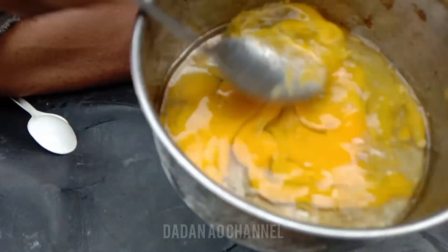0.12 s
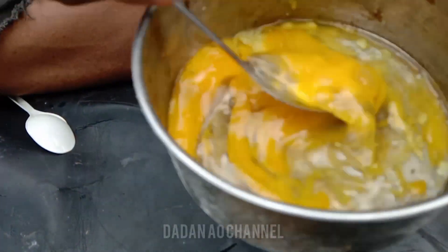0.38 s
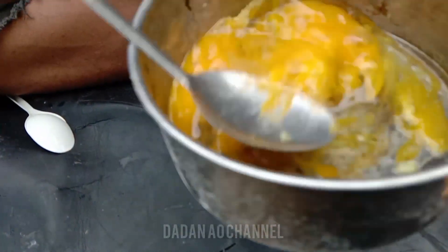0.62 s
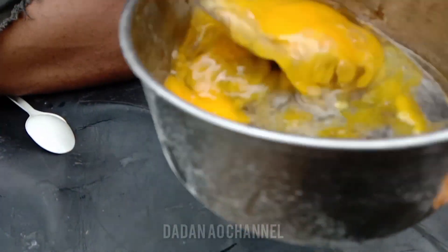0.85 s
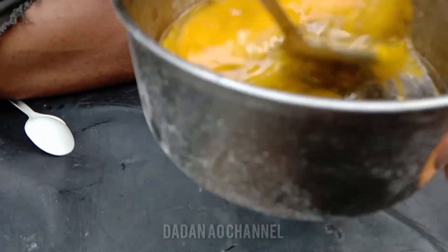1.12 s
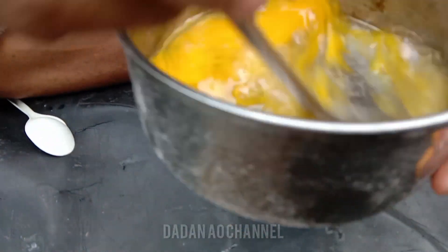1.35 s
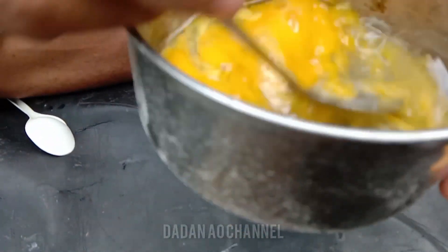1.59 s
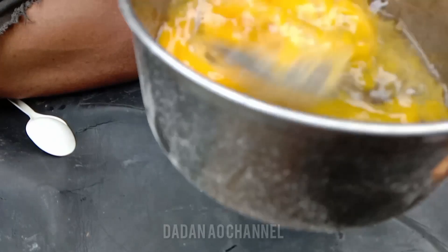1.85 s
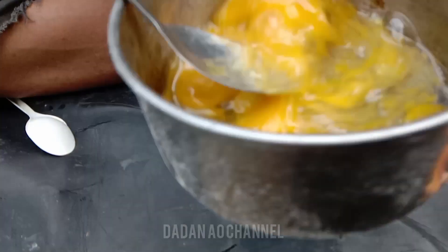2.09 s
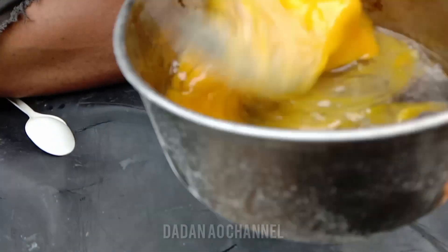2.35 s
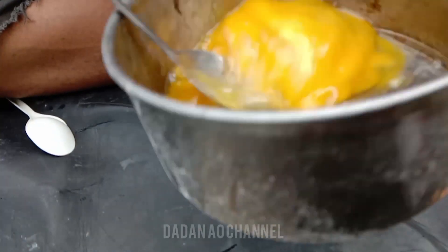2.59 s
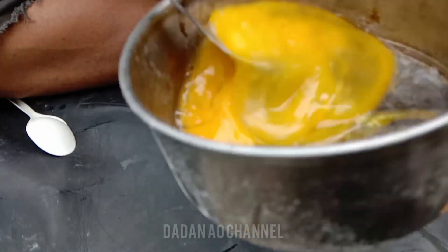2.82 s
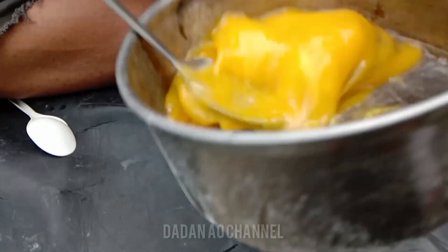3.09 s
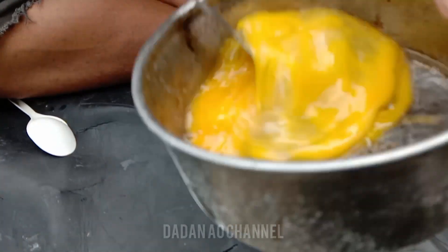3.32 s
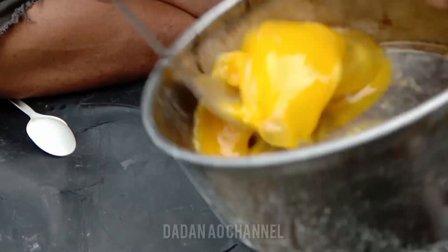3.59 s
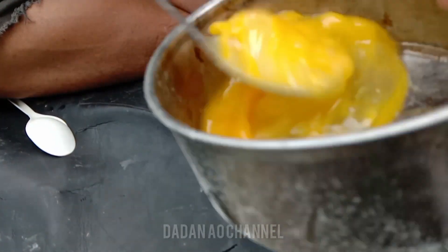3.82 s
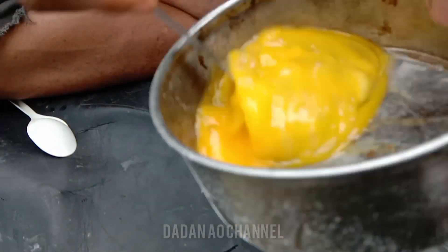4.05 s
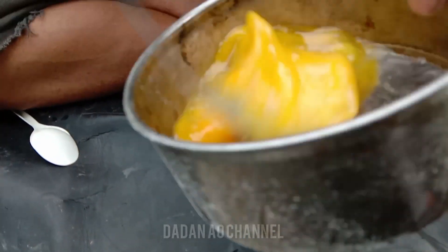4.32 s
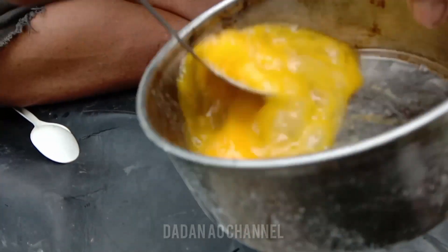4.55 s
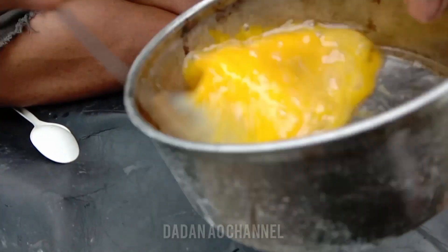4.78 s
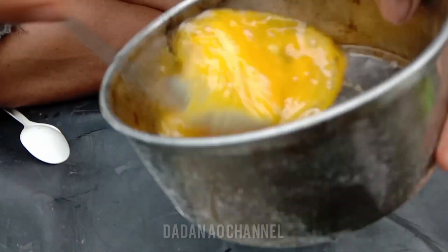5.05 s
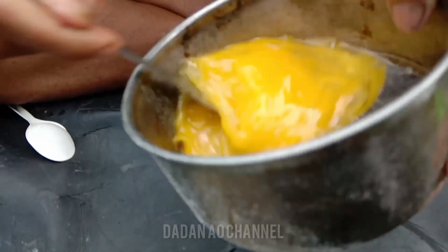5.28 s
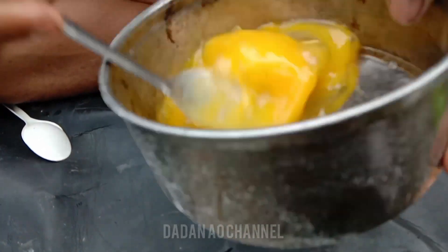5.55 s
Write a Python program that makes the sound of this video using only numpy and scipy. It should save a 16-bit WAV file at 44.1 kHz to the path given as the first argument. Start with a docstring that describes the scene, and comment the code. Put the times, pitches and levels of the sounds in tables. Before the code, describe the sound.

Close, quick metallic knocks and gritty scrapes of a spoon whisking wet eggs in a metal bowl, settling into a brisk regular beat.

```python
"""Knocks, scrapes and wet slaps: a steel spoon beats raw eggs in a thin steel bowl, close to a phone; insects
shrill outside. First loose scraping swirls, then six strokes a second. Knocks ring damped modes of bowl and
spoon, drags are noise and random slips played into those modes, egg slaps are gliding tones, floor and foot
give low thuds, insects and air are filtered noise."""
import sys
import numpy as np
from scipy import signal
from scipy.fft import rfft, irfft, next_fast_len
from scipy.io import wavfile
from scipy.ndimage import uniform_filter1d, map_coordinates

SR = 44100
rng = np.random.default_rng(int(sys.argv[2]) if len(sys.argv) > 2 else 0)


def to_wav(s):
    """Save 16-bit WAV."""
    ch = np.atleast_2d(s).T  # columns
    pcm = np.round(np.clip(ch, -1, 1) * 32767)  # PCM
    wavfile.write(sys.argv[1], SR, pcm.astype(np.int16))


def convert_level_to_amplitude(level_db):
    """Map a level in decibels to its linear amplitude factor."""
    exponent = np.asarray(level_db, float) / 20
    return 10 ** exponent


N = 249687

# spoon meets bowl: (time [s], relative bowl level [dB], pitch the blow favours [Hz],
# relative spoon level [dB], ring length [share 0-1])
KNOCKS = [(0.025, -40, 1210, -33.5, 0.7), (0.086, -34, 1860, -25, 0.9), (0.123, -42, 1244, -19.5, 0.9),
          (0.137, -20.5, 794, -20.5, 0.9), (0.17, -27, 1940, -27, 0.8), (0.192, -30, 1930, -20, 0.9),
          (0.238, -19, 1820, -19.5, 1), (0.287, -25.5, 832, -24, 0.8), (0.311, -21, 1940, -30, 0.6),
          (0.323, -14.5, 830, -22, 0.6), (0.406, -27.5, 1170, -15, 0.7), (0.421, -12.5, 793, -26.5, 0.7),
          (0.508, -29.5, 1610, -23.5, 0.7), (0.566, -7.5, 1110, -18, 0.7), (0.632, -23.5, 1170, -17.5, 0.7),
          (0.694, -7.5, 1152, -23.5, 0.6), (0.706, -15, 950, -22.5, 0.9), (0.785, -28.5, 1440, -19, 1),
          (0.846, -17.5, 1120, -27.5, 1), (0.854, -21, 1150, -18.5, 0.9), (0.895, -17.5, 1090, -18, 0.8),
          (0.911, -15, 1227, -35, 0.5), (0.957, -24.5, 1210, -17, 0.7), (1.021, -2, 895, -25, 0.73),
          (1.121, -25, 1130, -34.5, 0.8), (1.197, -30, 869, -44, 0.66), (1.257, -15, 907, -16, 0.7),
          (1.304, -27, 776, -24.5, 0.8), (1.401, -34.5, 1000, -35, 0.6), (1.451, -36, 1930, -26.5, 0.6),
          (1.474, -26, 930, -30.5, 0.7), (1.486, -21, 847, -30.5, 0.7), (1.587, -28.5, 1780, -33.5, 1),
          (1.681, -24.5, 1910, -29, 0.7), (1.702, -10, 1830, -22, 0.64), (1.8, -14.5, 1530, -13.5, 0.9),
          (1.831, -9.5, 799, -18, 0.6), (1.961, -15.5, 1590, -15.5, 1), (2.008, -6, 1110, -19, 0.6),
          (2.064, -14.5, 1520, -27.5, 0.6), (2.13, -22.5, 1710, -19.5, 1), (2.182, -8, 1234, -16.5, 0.7),
          (2.305, -13, 1660, -19.5, 0.8), (2.353, -8, 1036, -17, 0.9), (2.475, -12.5, 1195, -18, 0.8),
          (2.501, -8, 1150, -22, 0.6), (2.645, -14.5, 818, -17, 0.9), (2.668, -8, 1107, -24, 0.57),
          (2.801, -15.5, 1520, -20, 0.8), (2.824, -8.5, 1153, -19.5, 0.8), (2.964, -17, 1150, -18, 0.8),
          (2.982, -16, 1000, -26.5, 0.9), (3.026, -26.5, 1120, -30.5, 0.3), (3.13, -12.5, 1270, -20, 0.5),
          (3.147, -15.5, 962, -35, 0.76), (3.289, -12, 1330, -15, 0.9), (3.466, -7.5, 1030, -17.5, 0.7),
          (3.618, -4, 1000, -16, 0.6), (3.64, -11, 974, -32, 0.7), (3.666, -15, 1110, -25.5, 0.7),
          (3.772, -3.5, 983, -19, 0.8), (3.819, -18, 1210, -24, 0.8), (3.916, -9.5, 1143, -13.5, 0.6),
          (3.939, -2, 1210, -15, 0.6), (4.079, -4.5, 1272, -16.5, 0.8), (4.148, -30, 1740, -41, 0.67),
          (4.238, -13, 1676, -17.5, 0.7), (4.245, -6, 888, -21.5, 0.9), (4.417, -4.5, 1183, -15.5, 0.7),
          (4.552, -14.5, 1185, -17.5, 0.8), (4.586, -5, 1210, -21.5, 0.7), (4.713, -13, 869, -14.5, 0.7),
          (4.731, -20.5, 690, -24, 0.8), (4.742, -14, 1183, -25.5, 0.7), (4.77, -20, 716, -29, 0.8),
          (4.87, -15.5, 807, -12.5, 0.9), (4.893, -22.5, 1750, -22.5, 0.7), (4.903, -10.5, 1310, -23, 0.8),
          (4.932, -12, 1030, -22, 0.8), (5.035, -16.5, 1197, -19.5, 0.9), (5.078, -6.5, 900, -19.5, 0.6),
          (5.194, -9.5, 1175, -25, 0.5), (5.235, -12.5, 734, -21.5, 0.64), (5.338, -14, 1620, -13.5, 0.8),
          (5.369, -5.5, 837, -19.5, 0.6), (5.398, -12.5, 738, -20, 0.8), (5.501, -16, 1470, -18, 0.9),
          (5.528, -7.5, 1183, -24.5, 0.5), (5.564, -17, 1000, -24, 0.5)]
# egg-damped bowl modes, before each blow retunes them: (frequency [Hz], relative level [dB], full-length t60 [s])
BOWL_MODES = [(595, -8, 0.027), (763, -2.5, 0.087), (859.6, -3.5, 0.12), (1000, -3, 0.09),
              (1110, -1.5, 0.04), (1210, -2.5, 0.099), (1574.5, -4, 0.059), (1760, -4, 0.036),
              (1940, -6, 0.03), (2132, -8, 0.052), (2245, -13, 0.0096), (2780, -7.5, 0.043),
              (3207, -8, 0.039), (3620, -12.5, 0.044)]
# spoon modes, before grip and blow alter them: (frequency [Hz], relative level [dB], free t60 [s])
SPOON_MODES = [(4895, -6.5, 0.021), (5070, -3, 0.051), (5470, 8.5, 0.046), (5807, 5.5, 0.11),
               (6440, -0.5, 0.0062), (6570, 3.5, 0.082), (7265, 7, 0.061), (7910, -3, 0.013),
               (7970, -8.5, 0.039), (7890, -36.5, 0.053), (9470, -36, 0.01), (10300, -15, 0.18),
               (12950, -6, 0.045), (15000, -25, .02), (15020, -9.5, 0.022)]
# steel on steel, noise spectrum: (frequency [Hz], relative level [dB per Hz])
GRIT = [(2060, -48), (3500, -6), (4180, -28), (4430, -13), (5460, -8), (5900, -6), (7320, -10.5),
        (9140, -11.5), (14900, -11), (16000, -26.5)]
# egg and bowl wall, noise spectrum: (frequency [Hz], relative level [dB per Hz])
SLOP = [(180, -76.5), (300, -34.5), (427, -8.5), (1200, -13), (1390, -2.5), (1570, -19.5), (1950, -33),
        (2320, -7), (4600, -20), (5980, -30), (10100, -120)]
GRAIN_DB = 3.2  # unevenness of the hiss


def unit(x):
    """Scales to rms 1."""
    return x / np.sqrt(np.mean(x ** 2) + 1e-20)


def along(points, hz):
    """Interpolates (Hz, value) points on a log frequency axis."""
    point_hz, value = np.transpose(points)
    return np.interp(np.log(hz + 1), np.log(point_hz + 1), value)


def wobble(rate_hz):
    """Smooth random curve, rate_hz knots a second."""
    knots = rng.standard_normal(int(N * rate_hz / SR) + 4)
    return map_coordinates(knots, [np.arange(N) * rate_hz / SR])


def filtered(x, response):
    """Multiplies the spectrum of x by a complex response of frequency."""
    m = next_fast_len(N + 8192)
    return irfft(rfft(x, m) * response(np.fft.rfftfreq(m, 1 / SR)), m)[..., :N]


def coloured(spectrum):
    """Noise of rms 1 with this spectrum."""
    return unit(filtered(rng.standard_normal(N), lambda hz: convert_level_to_amplitude(along(spectrum, hz))))


def patchy(x, depth_db):
    """Random patches of gain over pitch and time, rms 1."""
    z = signal.stft(x, nperseg=256)[2]
    field = uniform_filter1d(rng.standard_normal(z.shape), size=4, axis=0)
    field = uniform_filter1d(field, size=5, axis=1)
    return unit(signal.istft(z * convert_level_to_amplitude(depth_db * unit(field)), nperseg=256)[1][:N])


def resonant(x, modes, damping):
    """Plays x into parallel resonators of alternating sign; damping scales their bandwidths."""
    def response(f):
        total = 0
        for k, (centre_hz, db, t60_s) in enumerate(modes):
            loss = 1j * f * damping * np.log(1000) / (np.pi * t60_s)
            total = total + (-1) ** k * convert_level_to_amplitude(db) * loss / (centre_hz ** 2 - f * f + loss)
        return total
    return filtered(x, response)


def ring(modes, weight_db, pull, stretch, attack_s, detune, bend, t):
    """Decaying sines, peak 1; luck varies strength, pitch, phase and pitch drift, which sags on average."""
    hz, db, t60_s = np.transpose(modes)[:, :, None]
    luck = rng.standard_normal((4, len(hz), 1))
    scatter_db = 2.5 * luck[0]
    fade = convert_level_to_amplitude(db + weight_db + scatter_db - 60 * t / (t60_s * stretch))
    turns = hz * (pull + detune * luck[1]) * t * (1 + bend * (luck[3] - .6) * t)
    sound = (fade * np.sin(2 * np.pi * turns + 2 * luck[2])).sum(0) * (1 - np.exp(-t / attack_s))
    return sound / np.abs(sound).max()


def thuds(blows, t60_s, attack_s):
    """Low decaying sines with soft onsets and a fluttering level."""
    out, t = np.zeros(N + SR), np.arange(SR // 6) / SR
    for s, db, hz in blows:
        shape = convert_level_to_amplitude(db + 6.5 - 60 * t / t60_s) * (1 - np.exp(-t / attack_s))
        out[round(s * SR):][:len(t)] += shape * np.sin(2 * np.pi * hz * t)
    return out[:N] * convert_level_to_amplitude(3 * wobble(90))


def outdoors():
    """Insect song as narrow wavering noise bands, over quiet, lumpy air noise."""
    # insect bands: (centre [Hz], half-width to 1/e [Hz], level before the trend [dB])
    insect_bands = [(5435, 130, -62), (7320, 520, -66), (10040, 900, -83.5)]
    # air spectrum: (frequency [Hz], relative level [dB per Hz])
    air_spectrum = [(18, -26.5), (30, -6.5), (379, -9.5), (439, -18), (1870, -21), (2250, -29),
                    (3290, -27.5), (3810, -45.5), (4500, -40), (5850, -60.5), (9900, -120)]
    # slow level trend: (time [s], insect gain [dB], air gain [dB])
    trend = [(0, -5, 6.5), (1, 0, 4.5), (1.998, -3.5, 1.5), (3.999, 0, 1.5), (5.66, 3, 4)]
    s, insects_db, air_db = np.transpose(trend)
    time = np.arange(N) / SR
    song = 0
    for centre_hz, width_hz, db in insect_bands:
        band = filtered(rng.standard_normal(N), lambda f: np.exp(-((f - centre_hz) / width_hz) ** 2))
        song = song + convert_level_to_amplitude(db + 1.4 * wobble(2.8) + 1.5 * wobble(70)) * unit(band)
    air = convert_level_to_amplitude(-66.5 + 0.99 * wobble(5.5)) * patchy(coloured(air_spectrum), depth_db=3.5)
    return convert_level_to_amplitude(np.interp(time, s, insects_db)) * song + convert_level_to_amplitude(np.interp(time, s, air_db)) * air


def kitchen(x):
    """Nearby walls answer with a short decaying noise tail, 200 samples late."""
    t = np.arange(SR // 5) / SR
    tail = rng.standard_normal(len(t)) * convert_level_to_amplitude(-60 * t / 0.074)
    return signal.fftconvolve(np.pad(x, (200, 0)), tail / np.linalg.norm(tail))[:N]


def foot_bumps():
    """The bowl's foot bumps its support: low damped thuds."""
    # bumps: (time [s], relative level [dB], frequency [Hz])
    bumps = [(2.182, -45.5, 228), (2.497, -47.5, 219), (3.125, -55, 233), (3.285, -50.5, 162),
             (3.465, -44.5, 215), (3.664, -48, 237), (3.942, -42.5, 172), (4.081, -32.5, 166),
             (4.245, -47.5, 211), (4.587, -44.5, 152), (4.744, -39.5, 173), (4.928, -38, 221),
             (5.073, -28.5, 227), (5.235, -46.5, 223), (5.393, -42, 190), (5.499, -48, 226)]
    return thuds(bumps, t60_s=0.057, attack_s=0.0025)


def floor_booms():
    """The first blow of each stroke booms the flat floor of the bowl; its pitch shifts with the egg over it."""
    # floor mode: (time [s], mean frequency [Hz], level relative to the blow [dB])
    floor_mode = [(1.7, 445, -19), (1.9, 387, -13), (2.3, 456, -27.5), (2.7, 419, -17), (3.1, 484, -18.5),
                  (3.5, 519, -30), (3.9, 557, -19), (4.3, 478, -27), (4.7, 553, -19.5), (5.04, 444, -14.5),
                  (5.19, 493, -38.5), (5.34, 486, -15), (5.5, 448, -28.5)]
    beating_from_s, swing_s = 1.67, .07  # a blow after a longer gap than swing_s lands a stroke
    s, bowl_db = np.transpose(KNOCKS)[:2]
    first = (np.diff(s, prepend=0) > swing_s) & (s > beating_from_s)
    when, mean_hz, under_db = np.transpose(floor_mode)
    hz = np.interp(s, when, mean_hz) * (1 + .04 * rng.standard_normal(len(s)))
    db = bowl_db + np.interp(s, when, under_db)
    return thuds(zip(s[first], db[first], hz[first]), t60_s=0.055, attack_s=0.0017)


def slaps():
    """The egg slaps the bowl: unsteady tones rise in pitch as each one dies, with a little splash."""
    # slaps: (time [s], relative level [dB], starting frequency [Hz], life [s])
    slap_rows = [(.295, -25.5, 820, .047), (.8, -25.5, 1470, 0.11), (0.806, -24, 2800, .03),
                 (.964, -13.5, 2080, 0.044), (1.2, -33, 900, 0.091), (1.32, -32.5, 790, 0.055),
                 (1.401, -30.5, 1000, .05), (1.509, -30.5, 720, 0.046), (2.02, -40.5, 390, 0.1),
                 (2.198, -23.5, 855, 0.023), (2.375, -24, 866, 0.05), (2.511, -34.5, 1560, 0.074),
                 (2.519, -26.5, 858, .055), (2.557, -35.5, 1025, 0.029), (2.74, -40, 1760, 0.018),
                 (2.858, -29.5, 1190, 0.044), (3.23, -60, 2570, .041), (3.397, -47, 2180, 0.028),
                 (3.705, -35, 793, 0.039), (3.839, -28.5, 730, 0.037), (3.865, -28, 1200, .018),
                 (4.147, -19.5, 2660, .013), (4.187, -49.5, 1220, 0.04), (4.287, -25, 1514, 0.032),
                 (4.332, -26, 850, 0.046), (4.336, -38, 2400, .02), (4.619, -33, 853, 0.026),
                 (5.11, -49, 3200, 0.038), (5.12, -48, 1150, 0.042), (5.257, -44, 1125, .03),
                 (5.41, -37.5, 850, 0.059), (5.599, -57, 1256, .039), (5.649, -36.5, 610, 0.089),
                 (5.648, -40.5, 1330, 0.068)]
    rise, onset = .022, 0.068  # pitch-glide coefficient; onset time constant as a share of life
    out, splash, t = np.zeros(N + SR), np.zeros(N + SR), np.arange(SR // 6) / SR
    shake, flutter = wobble(110), wobble(110)
    for s, db, hz, life_s in slap_rows:
        at = slice(round(s * SR), round(s * SR) + len(t))
        shape = convert_level_to_amplitude(db - 41.0 * (t / life_s) ** 1.25) * (1 - np.exp(-t / (onset * life_s)))
        out[at] += shape * np.sin(2 * np.pi * hz * (t + rise * t * t / life_s))
        splash[at] += shape * convert_level_to_amplitude(-13)
    wavering = map_coordinates(out, [np.arange(N) + 6 * shake], order=1)  # uneven delay = uneven pitch
    return wavering * convert_level_to_amplitude(4 * flutter) + splash[:N] * coloured(SLOP)


def drags():
    """Rough contact: dense slips of uneven size shake spoon and bowl; sparse catches rattle them."""
    # drags: (start [s], time to full pressure [s], time from there to lift-off [s], relative hiss level [dB])
    scrapes = [(0, 0.0022, 0.017, -34), (0.082, .002, 0.011, -27), (.108, 0.018, 0.011, -26),
               (0.159, .002, .012, -22), (.172, .01, .035, -32), (.231, 0.0074, .02, -35),
               (.255, 0.016, 0.0073, -12.5), (0.274, 0.0093, 0.026, -29), (.311, .002, .012, -19),
               (.325, 0.04, .027, -13.5), (.395, 0.013, 0.014, -17), (.413, .003, 0.05, -31),
               (0.51, 0.0022, 0.011, -14.5), (.523, 0.037, 0.0046, -19.5), (.569, 0.0037, 0.046, -34),
               (0.621, .002, .008, -38.5), (.63, 0.021, 0.03, -15), (.684, .025, 0.054, -30),
               (0.779, 0.016, .025, -17), (0.835, 0.025, .006, -22), (.866, .003, .02, -33),
               (.89, .003, .025, -28), (0.959, 0.0032, 0.056, -15.5), (1.032, .03, 0.088, -38),
               (1.136, 0.027, 0.02, -49), (1.185, .03, 0.027, -38.5), (1.243, 0.013, .06, -35.5),
               (1.297, 0.021, 0.03, -28.5), (1.365, .075, .01, -36), (1.452, 0.0045, 0.088, -27.5),
               (1.553, 0.041, .038, -37.5), (1.637, 0.055, .02, -36.5), (1.798, 0.011, .015, -33.5),
               (1.844, 0.0027, 0.034, -27.5), (1.98, 0.02, .016, -21.5), (2.021, .003, 0.049, -28.5),
               (2.15, .022, 0.0069, -25), (2.182, 0.017, 0.028, -41), (2.322, .01, 0.01, -30),
               (2.338, 0.02, 0.028, -34.5), (2.483, .022, .005, -29), (2.505, .02, .035, -41),
               (2.642, 0.0036, .032, -35.5), (2.67, 0.0035, .045, -40), (2.81, 0.009, .005, -41.5),
               (2.83, 0.027, 0.018, -40.5), (2.965, 0.0019, 0.036, -31.5), (3.012, 0.0024, 0.022, -38.5),
               (3.125, 0.0061, 0.064, -39.5), (3.285, 0.039, 0.037, -40.5), (3.458, .022, 0.039, -44.5),
               (3.617, 0.0023, .04, -32.5), (3.651, .018, 0.02, -35), (3.764, .007, .003, -37.5),
               (3.775, .003, 0.086, -44), (3.914, .003, 0.017, -27.5), (3.94, .003, 0.058, -44),
               (4.072, .008, 0.0022, -34.5), (4.08, .003, .075, -42.5), (4.238, 0.0026, 0.015, -26),
               (4.255, .015, .045, -41.5), (4.42, .003, 0.041, -37), (4.555, .03, .008, -19),
               (4.6, 0.0026, 0.028, -39.5), (4.713, .003, 0.022, -40.5), (4.734, .003, 0.041, -30.5),
               (4.866, 0.0036, 0.016, -36.5), (4.892, 0.0025, 0.03, -29.5), (5.033, .01, 0.013, -23.5),
               (5.055, .015, 0.024, -36.5), (5.192, .003, .04, -31.5), (5.229, 0.0027, .028, -44),
               (5.338, 0.054, 0.0086, -28), (5.374, 0.0027, 0.024, -36), (5.395, 0.0036, 0.015, -32.5),
               (5.494, 0.035, 0.0058, -44), (5.531, .003, 0.035, -34)]
    # egg between spoon and wall: (time [s], bowl wall over hiss [dB])
    cushion = [(0, -4), (.3, -14.5), (.6, -15), (.9, -5.5), (1.0, -11.5), (1.4, -2.5), (1.9, -8),
               (2.3, -0.5), (2.7, 3), (3.0, 8.5), (3.5, 9.5), (3.9, 10.5), (4.3, 6), (4.57, 0.5),
               (4.9, 7.5), (5.3, 7), (5.66, 6)]
    touch_db, lift_db = -13.5, -15  # pressure at first touch and lift-off, re full pressure
    time = np.arange(N) / SR
    push = 0
    for s, rise_s, fall_s, db in scrapes:
        corners_s = np.cumsum([s, rise_s, fall_s])
        push = push + convert_level_to_amplitude(db + np.interp(time, corners_s, [touch_db, 0, lift_db], -200, -200))
    push = uniform_filter1d(push, 90)
    spoon_push, bowl_push = push, push * convert_level_to_amplitude(np.interp(time, *np.transpose(cushion)))

    chatter_db = 1.5 * wobble(120) + 1.9 * wobble(460)
    slips = rng.standard_normal((2, N)) * convert_level_to_amplitude(7.4 * rng.standard_normal((2, N)))
    spoon_slips = unit(resonant(slips[0], SPOON_MODES, damping=.9))
    hiss = patchy(1.08 * spoon_slips + 0.73 * coloured(GRIT), depth_db=GRAIN_DB)
    linger = np.exp(-time[:SR // 20] / 0.0078)  # the bowl wall rings on after each push
    swell = signal.fftconvolve(bowl_push, linger / linger.sum())[:N]
    bowl_slips = unit(resonant(slips[1], BOWL_MODES, damping=1.0))
    hollow = patchy(1.8 * bowl_slips + 0.77 * coloured(SLOP), depth_db=6.0)

    # the edge snags and lets go, 520 times a second on average
    catches = (rng.random(N) < 520 / SR) * rng.uniform(-1.11, 1, N) ** 3
    rattle = 0
    for pressure, modes in ((spoon_push, SPOON_MODES), (bowl_push, BOWL_MODES)):
        reference = resonant(catches, modes, damping=5.1).std()
        rattle = rattle + convert_level_to_amplitude(-6) * resonant(pressure * catches, modes, damping=0.87) / reference
    scrape = spoon_push * unit(convert_level_to_amplitude(chatter_db) * hiss)
    return rattle + scrape + swell * unit(convert_level_to_amplitude(0.25 * chatter_db + 1.8 * wobble(43)) * hollow)


def knocks():
    """A blow rings bowl and spoon modes and throws a short burst of grit and slop noise."""
    soften_db = 0.13  # slower bowl onset for each dB that the bowl stands over the spoon
    pinch = .22  # share of the spoon's ring that the fingers leave
    out, t = np.zeros(N + SR), np.arange(SR // 8) / SR
    grit_burst, slop_burst = np.zeros((2, N + SR))
    bowl_hz = np.array(BOWL_MODES)[:, :1]
    slosh = np.pad(convert_level_to_amplitude(2.08 * wobble(120)), (0, SR))  # moving egg makes the ring flutter
    for s, bowl_db, hz, spoon_db, length in KNOCKS:
        at = slice(round(s * SR), round(s * SR) + len(t))
        bare_db = spoon_db - bowl_db + 8.5
        near = np.exp(-(np.log(bowl_hz / hz) / 0.13) ** 2)  # the place of the blow picks its modes
        pull = (hz / bowl_hz) ** (0.43 * near)  # and the egg lying there retunes them
        tilt_db = 0.19 * bare_db * np.log2(bowl_hz / 1100)  # egg-cushioned blow dull, bare one bright
        attack_s = 0.00076 * convert_level_to_amplitude(-soften_db * bare_db)
        bowl = ring(BOWL_MODES, 11 * near + tilt_db, pull, length, attack_s, detune=0.035, bend=.3, t=t)
        spoon = ring(SPOON_MODES, 0, 0.94, pinch * length, 0.00096, detune=0.048, bend=0, t=t)
        out[at] += convert_level_to_amplitude(bowl_db + 2) * slosh[at] * bowl
        out[at] += convert_level_to_amplitude(spoon_db + 5.5) * spoon
        grit_fade = convert_level_to_amplitude(spoon_db + 4.0 - 60 * t / (0.016 * length))
        slop_fade = convert_level_to_amplitude(bowl_db + 0.16 * bare_db - 10 - 60 * t / (0.048 * length))
        grit_burst[at] += grit_fade * (1 - np.exp(-t / 0.00078))
        slop_burst[at] += slop_fade * (1 - np.exp(-t / 0.00087))
    grit = grit_burst[:N] * patchy(coloured(GRIT), depth_db=GRAIN_DB)
    slop = slop_burst[:N] * patchy(coloured(SLOP), depth_db=2.5)
    return out[:N] + grit + slop


def thin_wall(x):
    """The thin wall radiates little bass: four cascaded first-order high-passes at 480 Hz."""
    return filtered(x, lambda hz: (1j * hz / 480 / (1 + 1j * hz / 480)) ** 4)


def scene():
    """Bowl close, with a faint answer of the kitchen; insects far."""
    bowl = thin_wall(knocks() + drags()) + slaps() + floor_booms() + foot_bumps()
    return (bowl + convert_level_to_amplitude(-17.0) * kitchen(bowl) + outdoors())[None]


def phone_band(hz):
    """Gain of the phone: bass roll-off around 60 Hz, a step down at 15.7 kHz, nothing from 16.8 kHz."""
    treble = np.where(hz < 15700, 1, convert_level_to_amplitude(-18.5)) * (hz < 16800)
    return treble / (1 + (60 / (hz + 1)) ** 3)


def roll_off(x):
    """The treble ends steeply here."""
    return signal.sosfilt(signal.butter(12, 16800, fs=SR, output="sos"), x)


def record(dry):
    """The phone rounds off the highest peaks and limits the band."""
    rounded = dry / (1 + np.abs(dry / .9) ** 4) ** (1 / 4)
    mix = filtered(rounded, phone_band)
    return roll_off(mix)


dry = scene()
out = record(dry)
to_wav(out)
```